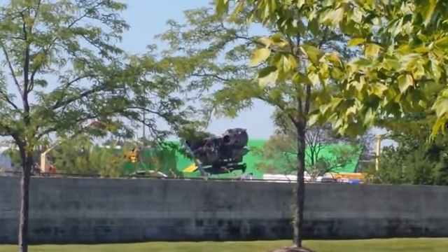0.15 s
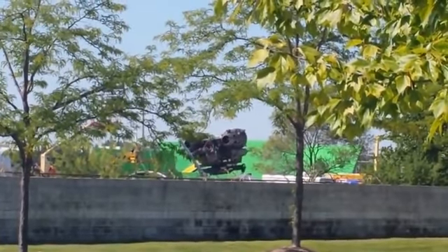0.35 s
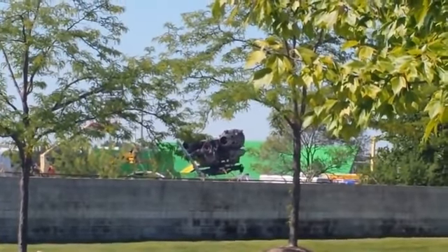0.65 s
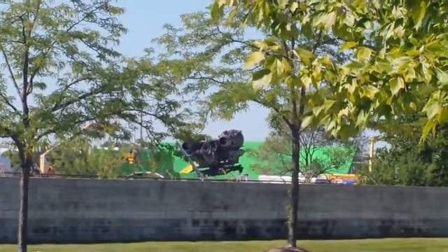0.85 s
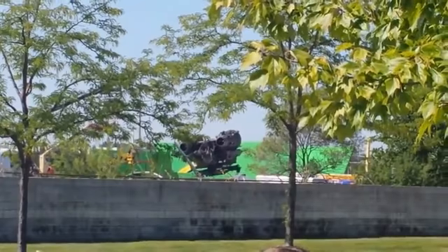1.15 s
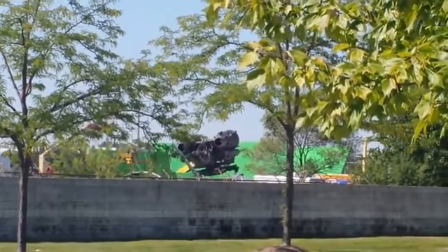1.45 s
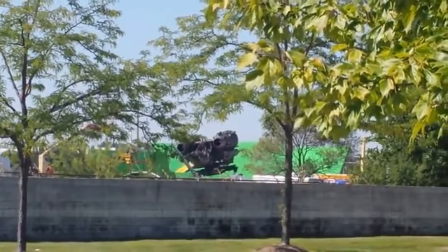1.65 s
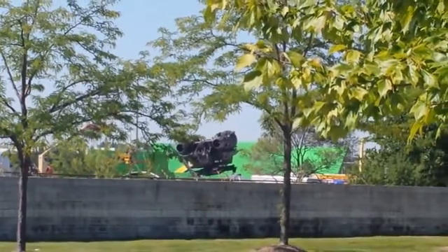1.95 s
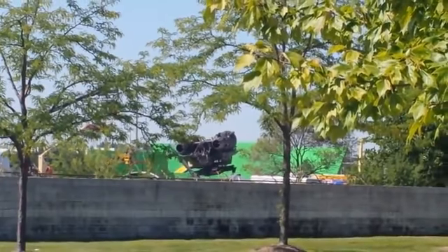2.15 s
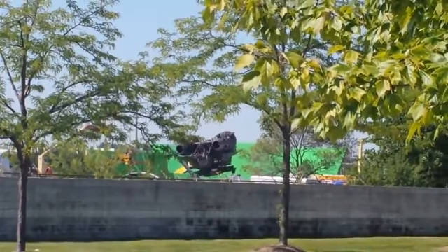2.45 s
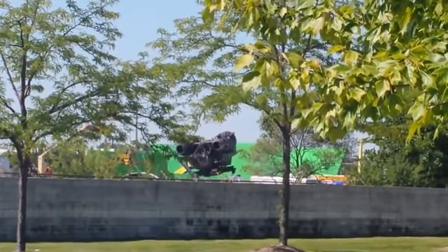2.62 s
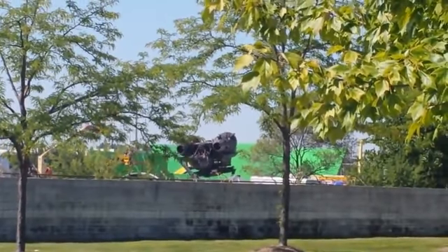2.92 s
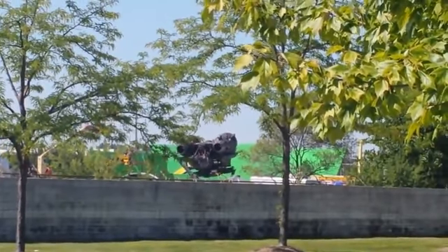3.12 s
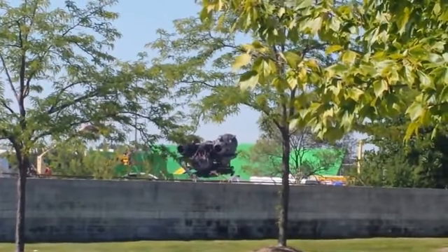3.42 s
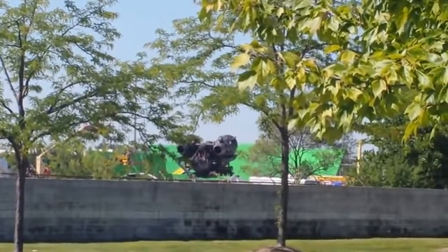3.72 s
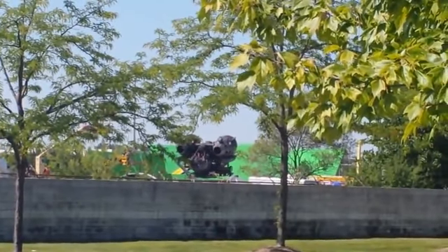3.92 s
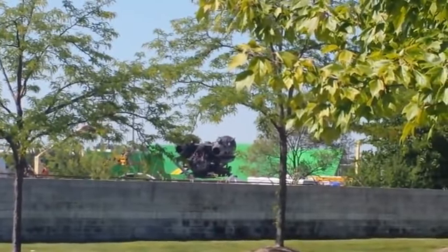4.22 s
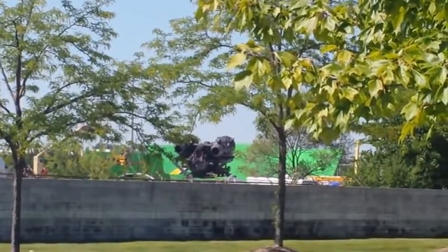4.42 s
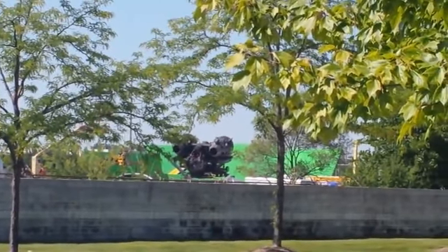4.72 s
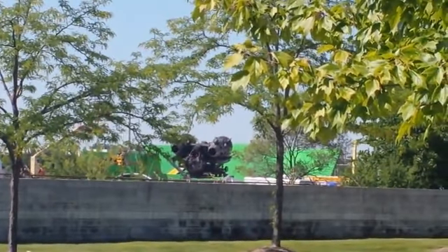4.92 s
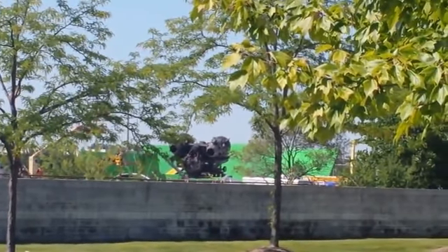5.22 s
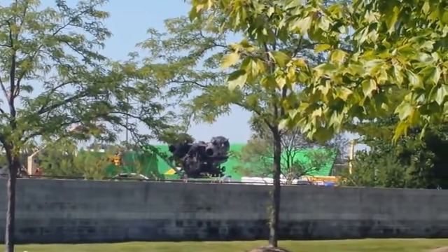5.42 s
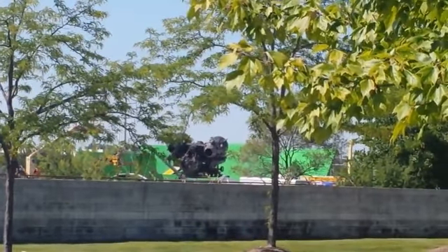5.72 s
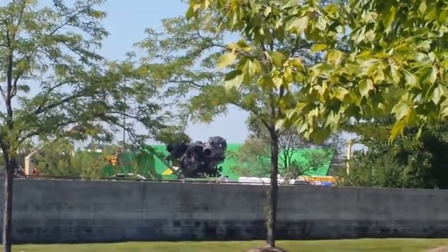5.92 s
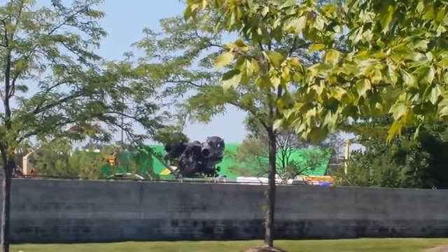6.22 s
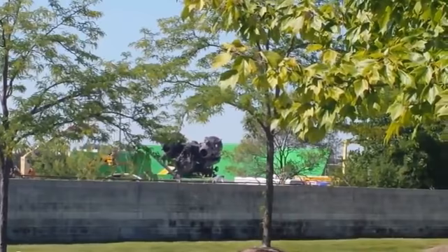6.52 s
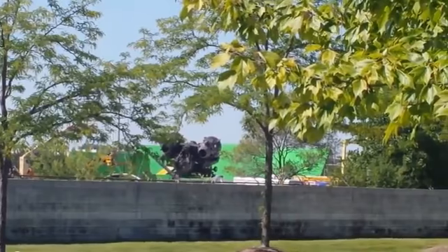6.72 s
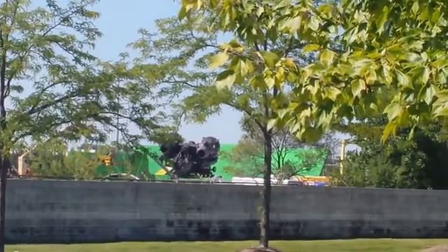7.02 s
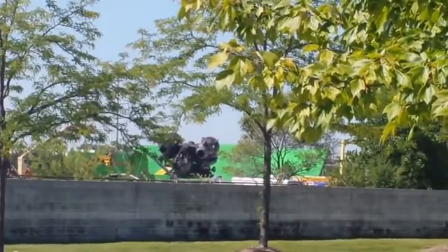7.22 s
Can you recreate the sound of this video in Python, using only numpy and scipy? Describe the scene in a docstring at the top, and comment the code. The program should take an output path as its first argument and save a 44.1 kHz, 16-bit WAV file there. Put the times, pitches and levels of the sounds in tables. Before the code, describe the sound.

Open air in late summer, heard in wide stereo with no room echo. From 0 to 7.4 seconds a deep, distant engine rumble and steady low machine hum waver gently; one motor's very low note climbs from about 1 to 3 seconds, holds, then drops away around 6. High on the right, a katydid trills about eighteen quick pulses a second, with a fainter rival sliding in and out of step. A fine hiss of far insects fills the background. A thin, shimmering cicada buzz on the left and centre fades after 5.5, while a rasping cicada chorus emerges around 3 and grows strong by the end. Faint hooked bird chips come left near 0.7, 1.8 to 2.2, 3.8 to 4.1, 5.1 to 5.4, 6.1 and 6.6. A tiny sharp tick snaps left at 1.3; soft grainy rustling brushes close by at 6.4 to 6.7.

```python
"""Late-summer trees beside a concrete wall, with engines that hum, rumble and pull away behind it.
Two meadow katydids trill on the right: each wing stroke is a sine that follows an arch of pitch.
A cicada buzzes on the left as a stack of wavering partials; then a chorus swells, built of rib clicks and noise.
Small birds chip in short runs of hooked whistles over a hiss of far insects, coloured noise like the rumble.
One sharp tick is a snap of noise with a brief ring, and some soft rustling is grainy noise close by."""
import sys
import numpy as np
from scipy import signal
from scipy.fft import rfft, irfft
from scipy.io import wavfile
from scipy.ndimage import map_coordinates

SR = 44100
rng = np.random.default_rng(int(sys.argv[2]) if len(sys.argv) > 2 else 0)


def bounce(signal):
    """Save signal as a 16-bit WAV file at the path given by the first command-line argument."""
    frames = np.transpose(np.atleast_2d(signal))
    limited = np.clip(frames, -1, 1)
    pcm = np.round(limited * 32767).astype(np.int16)
    wavfile.write(sys.argv[1], SR, pcm)


N = 324576
T = np.arange(N) / SR   # time [s]
FREQS = np.maximum(np.fft.rfftfreq(N, 1 / SR), 1)   # spectrum bins [Hz], kept above zero for the logarithm


def from_db(db):
    """Decibels to gain."""
    return 10 ** (np.asarray(db) / 20)


def rms_one(x):
    """Scale to rms 1."""
    return x / np.sqrt(np.mean(np.abs(x) ** 2) + 1e-20)


def read(rows, at):
    """Every column of a table after the first, joined by straight lines."""
    first, *columns = np.transpose(rows)
    return np.array([np.interp(at, first, c) for c in columns])


def over_hz(rows):
    """Every column of a spectrum, on a log-frequency axis."""
    hz, *columns = np.transpose(rows)
    return np.array([np.interp(np.log(FREQS), np.log(hz), c) for c in columns])


def pan(lean_db):
    """Left and right gains for a level difference; positive leans left."""
    return from_db(np.array([[.5], [-.5]]) * lean_db)


def moment(s, half_s):
    """A bell-shaped rise and fall around one moment, 1 at its top."""
    return np.exp(-((T - s) / half_s) ** 2)


def drift(rate):
    """Smooth chance with about `rate` new values a second; spread about 1."""
    knots = rng.standard_normal(1024)
    coarse = T[::64]
    return np.interp(T, coarse, map_coordinates(knots, [coarse * rate + 2], order=3, mode="wrap"))


def colour(white, density_db):
    """Give white sound of rms 1 a spectrum in dB per Hz."""
    return irfft(rfft(white) * from_db(density_db) * np.sqrt(SR / 2), N)


def band_of(white, rows):
    """Colour by a left-right spectrum that falls away steeply under its lowest point and over its highest."""
    below = (.8 * rows[0][0] / FREQS) ** 12
    above = (FREQS / (1.2 * rows[-1][0])) ** 12
    skirts_db = -10 * np.log10((1 + below) * (1 + above))
    return colour(white, over_hz(rows) + skirts_db)


def tone(hz):
    """A sine of rms 1 that follows a pitch curve from a random phase."""
    return np.sqrt(2) * np.sin(2 * np.pi * (np.cumsum(hz) / SR + rng.random()))


def engines(deep_hz=55):
    """A broad noise rumble, alike in both ears in the bass; its deepest part comes and goes."""
    # engines and distant traffic: (frequency [Hz], density [dB per Hz])
    rumble = [(15, -93), (30, -74), (45, -60), (60, -57), (76, -59), (100, -55), (170, -60.5), (290, -68.5),
              (350, -78), (470, -78), (900, -79.5), (1450, -84), (2400, -86), (3300, -89.5), (13000, -112)]
    # how alike the two ears are: (frequency [Hz], likeness [-1 to 1])
    likeness = [(100, .98), (200, 0.94), (350, 0.81), (700, 0.39), (1300, -0.41), (2500, 0.089),
                (6000, -0.063)]
    # side the rumble leans to: (frequency [Hz], left-right difference [dB])
    lean = [(100, 1), (1200, 1.9), (2400, 4.5), (5000, 0.5)]
    # the deepest rumble: (time [s], level [dB])
    deep_level = [(0, -2), (2.2, -1), (4.7, -3), (5.7, 0), (6.3, -4), (7.36, -1)]
    deep_db, = read(deep_level, T)
    alike = np.clip(over_hz(likeness)[0], -.999, .999)
    mid, side = rfft(rng.standard_normal((2, N)))
    air = mid + np.sqrt((1 - alike) / (1 + alike)) * side * [[1], [-1]]
    spectrum = air * from_db(over_hz(rumble)) * pan(over_hz(lean)) * np.sqrt(SR / 2)
    deep_share = 1 / (1 + (FREQS / deep_hz) ** 8)
    deep = irfft(spectrum * deep_share, N)
    upper = irfft(spectrum * (1 - deep_share), N)
    return deep * from_db(deep_db) + upper


def pulling_engine():
    """The firing note of a distant engine, one sine that gathers speed, holds and drops away."""
    # the pull: (time [s], firing rate [Hz], level [dB])
    pull = [(0, 33, -48), (1.0, 35, -50), (1.5, 44.4, -48), (2.8, 57, -50), (3.5, 57.6, -44),
            (4.6, 57.4, -50), (5.8, 59.6, -55), (6.3, 58, -70)]
    hz, level_db = read(pull, T)
    return pan(.8) * from_db(level_db) * tone(hz)


def drones(wander_hz=1.132, flutter_db=1.36, fade_db=1.5):
    """Machine tones; moving air makes each machine fade and each partial waver in pitch and strength."""
    # four machines: (pitch [Hz], then relative levels of multiples 1, 2, 3, 4 [dB])
    machines = [(91.5, -3.5, -22, -24, -27.5), (135, -4, -20.5, -37, -25), (189.5, -1.5, -24, -20, -21.5),
                (208.9, -2.5, -46, -23.5, -46)]
    # strength of each machine in turn: (level [dB])
    strengths_db = [-43, -42, -43, -41.5]
    # a machine swells for a moment: (time [s], its rough pitch [Hz], extra level [dB], half length [s])
    machine_swells = [(0.53, 91.5, 8.5, 0.39), (2.88, 91.5, 7.5, 0.28), (6.67, 91.5, 7.5, 0.9),
                      (2.46, 209.1, 6.5, 0.21), (5.05, 209.1, 6, 0.33), (3.37, 188.8, 4.5, 0.47)]
    # a single overtone swells: (time [s], its rough pitch [Hz], extra level [dB], half length [s])
    overtone_swells = [(1.2, 574, 5, 0.43), (3.0, 626, 4.3, 1.1)]
    pitches = np.array(machines)[:, 0]
    levels_db = np.array([strength_db + fade_db * drift(3.567) for strength_db in strengths_db])
    for s, hz, extra_db, half_s in machine_swells:
        nearest = np.argmin(abs(pitches - hz))
        levels_db[nearest] += extra_db * moment(s, half_s)
    hum = np.zeros(N)
    for (hz, *partials_db), level_db in zip(machines, levels_db):
        for multiple, partial_db in enumerate(partials_db, 1):
            swell_db = sum(extra_db * moment(s, half_s) for s, swell_hz, extra_db, half_s in overtone_swells
                           if np.isclose(multiple * hz, swell_hz, rtol=.05))
            gain = from_db(level_db + partial_db + swell_db + flutter_db * drift(12))
            hum += gain * tone(multiple * hz + wander_hz * drift(10))
    return pan(0.9) * hum


def far_insects():
    """Many distant singers merge into a steady hiss: coloured noise with a slight flutter."""
    # hiss: (frequency [Hz], left density [dB per Hz], right density [dB per Hz])
    hiss = [(2860, -105, -105), (4250, -84.5, -86.5), (5000, -83, -89.5), (5800, -80.5, -87),
            (6270, -77.5, -80.5), (6870, -82, -87.5), (7400, -81, -84), (8450, -86, -73), (9500, -94, -88),
            (9840, -89, -84), (10450, -93.5, -91), (11930, -98, -92), (12000, -112, -108)]
    return band_of(rng.standard_normal((2, N)), hiss) * from_db(0.77 * drift(9.4))


def rustle(grain_db=1.0):
    """Brief, grainy rustles of noise close by; each swells and dies away."""
    # rustling colour: (frequency [Hz], left density [dB per Hz], right density [dB per Hz])
    rustle_colour = [(900, -79, -92), (1800, -79, -79), (2950, -74, -72.5), (5500, -75, -86),
                     (9000, -91, -93)]
    # the rustles: (time of the peak [s], level [dB], rise [s], decay [s])
    rustles = [(6.38, -5.5, .02, 0.065), (6.492, -0.5, .004, 0.024), (6.55, -6, 0.032, 0.15)]
    swell = sum(from_db(db) * np.exp(np.minimum((T - s) / rise_s, (s - T) / decay_s))
                for s, db, rise_s, decay_s in rustles)
    return band_of(rng.standard_normal((2, N)), rustle_colour) * swell * from_db(grain_db * drift(370))


def tick(lean_db=10, decay_s=.0005):
    """A single tick on the left: a broad snap of noise with a ring of about a millisecond."""
    # tick: (time [s], pitch [Hz], level of the ring [dB], level of the snap [dB])
    tick_shape = (1.2757, 5900, -21, -31)
    s, hz, ring_db, snap_db = tick_shape
    age = np.maximum(T - s, 0)
    ring = (age / decay_s * np.exp(1 - age / decay_s)) ** 2 * np.sin(2 * np.pi * hz * age)
    burst = (age > 0) * np.exp(-age / decay_s) * rng.standard_normal(N)
    snap = signal.lfilter(*signal.butter(1, 11000, fs=SR), burst)
    return pan(lean_db) * (from_db(ring_db) * ring + from_db(snap_db) * snap)


def bird(lean_db=6, echo_db=-6, rasp_db=0.5):
    """Short, slightly raspy whistles that hook over and drop, scattered by the trees."""
    # one chip of usual length: (time from its top [s], pitch as a share of the top, level [dB])
    chip = [(-.016, .86, -35), (-.008, .94, -7), (0, 1, 0), (.005, .97, -1.5), (.010, .85, -6.5),
            (.015, .74, -8.5), (.020, .65, -14), (.026, .58, -35)]
    # every chip: (time of the top [s], top pitch [Hz], level [dB], length as a share of the usual)
    chips = [(.685, 4170, -57, 1), (1.794, 4640, -46, 0.9), (1.906, 4620, -47, 0.93),
             (1.931, 4100, -52, 0.94), (2.018, 4600, -49, 1.1), (2.036, 4130, -48, .8),
             (2.141, 4180, -50, 1.2), (2.152, 4560, -50, 1.1), (3.833, 4570, -41, 1.1),
             (3.852, 2850, -54, 1.7), (3.951, 4440, -41.5, 1), (4.06, 2630, -56, 1.5),
             (4.084, 4440, -44.5, 1), (5.099, 4060, -51.5, 1.5), (5.249, 5000, -50, 2),
             (5.368, 4250, -52, 1.3), (6.099, 4550, -49, 0.9), (6.6, 5020, -45, .7)]
    song = np.zeros(N)
    for s, top_hz, level_db, length in chips:
        age = (T - s) / length
        during = (age > chip[0][0]) & (age < chip[-1][0])
        share, shape_db = read(chip, age[during])
        song[during] += from_db(level_db + shape_db) * tone(top_hz * share)
    song *= from_db(rasp_db * drift(400))
    trees = rng.standard_normal((2, 8192)) * np.exp(-T[:8192] / 0.022)
    trees /= np.linalg.norm(trees, axis=1, keepdims=True)
    scattered = signal.fftconvolve(song[None], trees, axes=1)[:, :N]
    return pan(lean_db) * (song + from_db(echo_db) * scattered)


def chorus(buzz_share=0.72, flutter_db=0.56, evenness=0.32, scatter_db=4.5, ribs=5, rib_loss_db=1):
    """Buckling ribs click, direct and scattered by the crowns, over the blur of more distant singers."""
    # the leader: (time [s], tymbal cycles per second [Hz])
    leader_rate = [(0, 158), (5.3, 160.3), (6, 161.7), (6.6, 162.8), (7.36, 163.2)]
    # singers: (cycle rate as a share of the leader's, left-right difference [dB], level [dB])
    singers = [(1, -3, 0), (1.056, 6, -7), (1.255, 2, -7)]
    # resonances of the singers' hollow bodies: (frequency [Hz], half width [Hz], lift [dB])
    body_peaks = [(6240, 90, 4.5), (6990, 60, 5), (7460, 100, 6), (7850, 65, 7.5), (8330, 60, 3)]
    # chorus colour: (frequency [Hz], left density [dB per Hz], right density [dB per Hz])
    chorus_colour = [(3000, -87, -100), (4400, -85.5, -90), (5080, -77, -82.5), (5700, -73, -80),
                     (6360, -71, -79), (6500, -69, -74), (6800, -71, -72), (7080, -75, -70),
                     (7500, -70.5, -68.5), (7830, -72, -69), (8100, -78, -71.5), (8300, -81, -69.5),
                     (9050, -74, -68.5), (9300, -74, -75), (9740, -79, -74.5), (10600, -82, -80),
                     (12400, -86, -83), (13300, -100, -104)]
    # the swell: (time [s], level [dB])
    swell = [(0, -40.5), (2, -33), (3, -21), (4, -13.5), (5, -9), (5.6, -5.5), (6.2, -3.5), (6.7, -1.1),
             (7.1, 1.2), (7.36, 2.5)]
    rate, = read(leader_rate, T)
    buzz = np.zeros((2, N))
    for rate_share, lean_db, level_db in singers:
        unsteady = 1 + .001 * drift(2) + .006 * drift(120)
        cycles = np.cumsum(rate * rate_share * unsteady) / SR
        rib = np.floor(cycles * ribs)
        # each rib of a tymbal buckles more weakly than the one before
        rib_gain = from_db(-rib_loss_db * (rib % ribs))
        clicks = np.diff(rib, prepend=0) * rib_gain * (evenness + rng.standard_normal(N))
        paths = rng.standard_normal((2, 2048)) * np.exp(-T[:2048] / 0.0092)
        paths *= from_db(scatter_db) / np.linalg.norm(paths, axis=1, keepdims=True)
        # the direct sound reaches each ear at its own time
        paths[[0, 1], rng.integers(0, 16, size=2)] += 1
        heard = signal.fftconvolve((clicks - clicks.mean())[None], paths, axes=1)[:, :N]
        buzz += pan(lean_db) * from_db(level_db) * rms_one(heard)
    blur = rng.standard_normal((2, N))
    song = np.sqrt(buzz_share) * rms_one(buzz) + np.sqrt(1 - buzz_share) * blur
    body_db = sum(lift_db / (1 + ((FREQS - hz) / half_hz) ** 2) for hz, half_hz, lift_db in body_peaks)
    song = irfft(rfft(song) * from_db(body_db), N)
    return band_of(song, chorus_colour) * from_db(read(swell, T)[0] + flutter_db * drift(30))


def near_cicada(wobble_hz=0.18, fade_db=1.5, shimmer_db=1.3, leaf_echo_db=-5.5, leaf_sways_per_s=6):
    """Two tymbals buckle in turn, favouring odd partials; paths through the leaves make each swell and fade."""
    # pace: (time [s], tymbal cycles per second [Hz])
    tymbal_hz = [(0, 200.4), (.75, 201.2), (1.25, 201.7), (2.25, 202.2), (3.25, 202.7), (4.3, 202.8),
                 (5.5, 202.3), (7.36, 202.5)]
    # partials: (multiple of the tymbal rate, level [dB], left-right difference [dB])
    partials = [(25, -68.5, 7), (27, -65, 5), (28, -65.5, 18), (29, -63, 16.5), (30, -70, 18),
                (31, -62.5, 10.5), (33, -65.5, 13), (35, -61.5, -6.5), (37, -57.5, -0.5), (39, -60, -2),
                (41, -61.5, 5)]
    # loudness, which dies away as the chorus takes over: (time [s], level [dB])
    buzz_level = [(0, 1), (4, 1.5), (4.6, -0.5), (5.2, 1.5), (5.9, -6), (7.36, -10)]
    # paths through the leaves fall into step: (time [s], multiple, extra level [dB], half length [s])
    partial_swells = [(.2, 39, 10, .35), (0.556, 37, 11.5, .3), (.8, 30, 6, .7), (.85, 33, 10, 0.63),
                      (.9, 25, 9, .1), (1.3, 28, 2.5, 0.64), (1.795, 37, 6.5, 0.5), (2.4, 35, 9, 0.27),
                      (2.35, 31, 7, 0.97), (3.0, 27, 8, 0.37), (3.2, 41, 9, .75), (3.602, 31, 5.5, 0.82),
                      (3.753, 29, 5.5, 0.34), (3.8, 35, 8, 0.68), (3.853, 37, 10, 0.13), (4.1, 39, 0, .8),
                      (4.9, 33, 8, .15), (5.0, 35, 7.5, 0.46)]
    cycles = np.cumsum(read(tymbal_hz, T)[0] + wobble_hz * drift(25.22)) / SR
    loudness_db = read(buzz_level, T)[0] + shimmer_db * drift(35)
    out = np.zeros((2, N))
    for multiple, level_db, lean_db in partials:
        swell_db = sum(extra_db * moment(s, half_s) for s, which, extra_db, half_s in partial_swells
                       if which == multiple)
        gain = from_db(loudness_db + level_db + swell_db + fade_db * drift(9.9))
        # each ear has a phase of its own
        phase = 2 * np.pi * (multiple * cycles + 0.52 * rng.random((2, 1)))
        # a reflection off swaying leaves beats against the direct partial
        detour = np.pi * np.array([drift(leaf_sways_per_s), drift(leaf_sways_per_s)])
        wave = np.sin(phase) + from_db(leaf_echo_db) * np.sin(phase + detour)
        out += pan(lean_db) * gain * np.sqrt(2) * wave
    return out


def wing_tone(rates, shape, trill, start, slip_s, spread_hz, spread_db, rough_db):
    """The scraper speeds up and slows down along the file: each stroke is an arch of pitch, no two quite alike."""
    rate, = read(rates, T)
    strokes = np.cumsum(rate) / SR + start
    which = np.round(strokes).astype(int)
    late, sharp, strong, drawn_out = rng.standard_normal((200, 4))[which].T   # one draw per stroke
    age = (strokes - which) / rate + slip_s * (.5 * late + drift(2))
    hz, level_db = read(shape, age * np.exp(-.05 * drawn_out))
    teeth_db = rough_db * drift(600)
    gain = from_db(read(trill, T)[0] + level_db + spread_db * strong + teeth_db)
    return gain * tone(hz + spread_hz * sharp)


def katydid(echo_s=.0105, echo_db=-17):
    """Two katydids' strokes slide in and out of step, with a faint echo and a haze of scattered sound."""
    # pace of the near one, then of the rival a little farther off: (time [s], wing strokes per second [Hz])
    stroke_rate = [(0.0, 18.35), (0.8, 18.37), (1.6, 18.15), (2.4, 18.32), (3.2, 18.15), (4.0, 18.13),
                   (4.8, 18.13), (5.6, 18.22), (6.4, 18.48), (7.36, 17.93)]
    rival_rate = [(0, 19.13), (1.3, 18.97), (2, 18.47), (2.9, 19.56), (3.5, 18.74), (4.1, 18.73),
                  (4.38, 17.03), (4.7, 18.93), (5.2, 18.77), (5.6, 18.25), (7.36, 18.8)]
    # one wing stroke, and the rival's lower, rounder one: (time from its middle [s], pitch [Hz], level [dB])
    stroke = [(-.0115, 8750, -50), (-.010, 8770, -8), (-.006, 8790, -2.2), (-.001, 8825, 0),
              (.002, 8820, 0), (.004, 8730, -.7), (.006, 8470, -2.5), (.0085, 8080, -4.5),
              (.0105, 7780, -10), (.013, 7500, -50)]
    rival_stroke = [(-.017, 7950, -50), (-.011, 8130, -7), (-.005, 8390, -3), (0, 8530, 0),
                    (.004, 8440, -1.5), (.008, 8170, -6), (.012, 7850, -13), (.016, 7650, -50)]
    # loudness at the top of a stroke, near one and rival: (time [s], level [dB])
    near_trill = [(0, -34.3), (1, -34.2), (2, -33.8), (3, -33.8), (4, -34.2), (4.6, -33), (6, -33.4),
                  (7, -32.3), (7.36, -32.8)]
    rival_trill = [(0, -38), (.4, -50), (.9, -38), (2.8, -39), (3.3, -49), (4, -37), (4.8, -36.5),
                   (5.3, -54), (6, -56), (7.36, -47)]
    # trill scattered by grass and leaves: (frequency [Hz], left density [dB per Hz], right density [dB per Hz])
    scatter = [(7400, -100, -92), (7950, -87, -80), (8300, -82, -75.5), (8700, -80, -74), (8950, -93, -85),
               (9300, -108, -102)]
    near = wing_tone(stroke_rate, stroke, near_trill, start=.134, slip_s=.0002,
                     spread_hz=10, spread_db=.5, rough_db=1)
    rival = wing_tone(rival_rate, rival_stroke, rival_trill, start=.848, slip_s=.001,
                      spread_hz=30, spread_db=1.4, rough_db=1.8)
    echo = from_db(echo_db) * np.pad(near, (round(echo_s * SR), 0))[:N]
    direct = (near + echo + rival) * from_db([[-16], [0]])   # left, right
    haze = band_of(rng.standard_normal((2, N)), scatter) * from_db(0.41 * drift(60))
    return direct + haze


def scene():
    """Insects and birds over the engines, with the rustles and the tick."""
    traffic = engines() + pulling_engine() + drones()
    insects = far_insects() + chorus() + near_cicada() + katydid()
    return traffic + insects + rustle() + tick() + bird()


def record(dry, cutoff_hz=14600):
    """The top is cut steeply by an elliptic low-pass."""
    return signal.sosfilt(signal.ellip(10, .1, 80, cutoff_hz, fs=SR, output="sos"), dry)


dry = scene()
out = record(dry)
bounce(out)
```